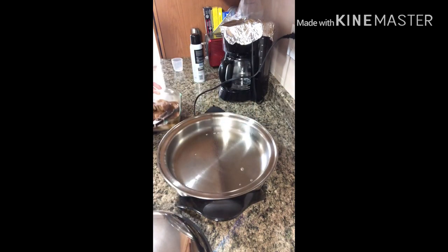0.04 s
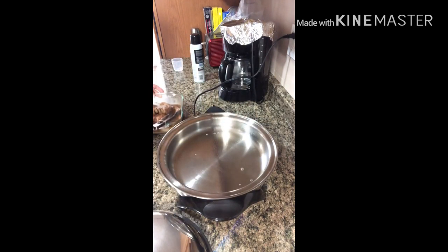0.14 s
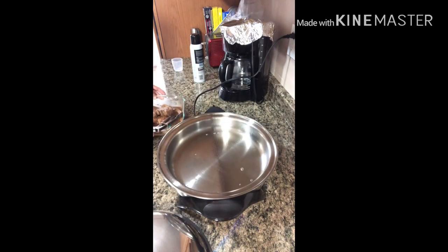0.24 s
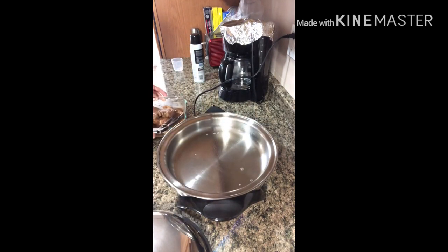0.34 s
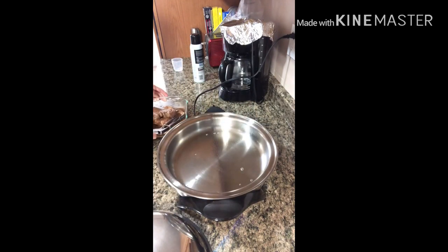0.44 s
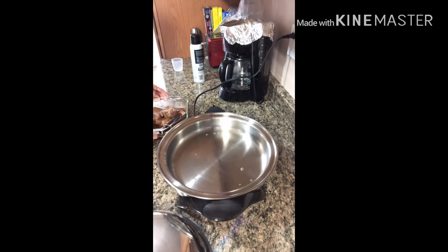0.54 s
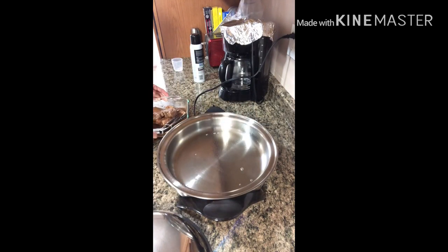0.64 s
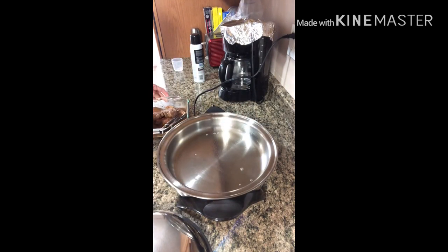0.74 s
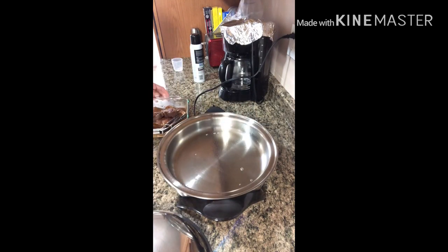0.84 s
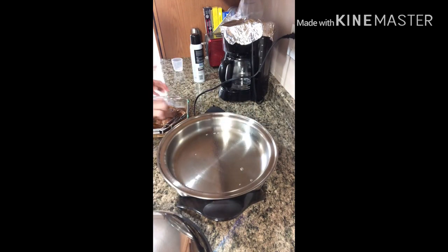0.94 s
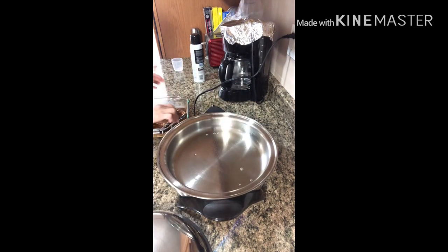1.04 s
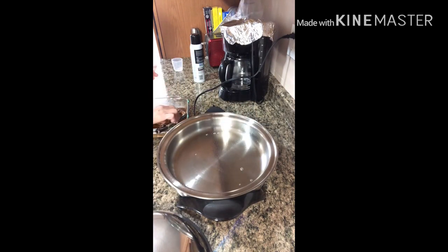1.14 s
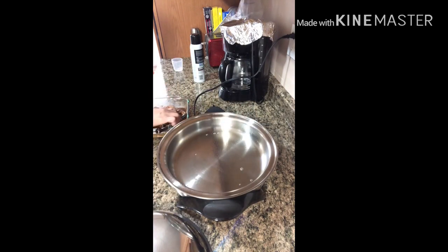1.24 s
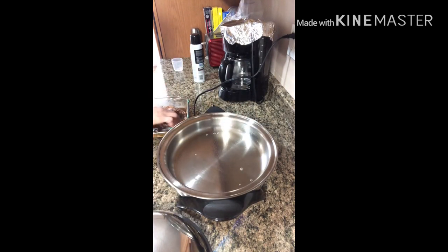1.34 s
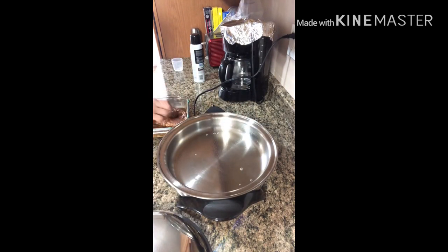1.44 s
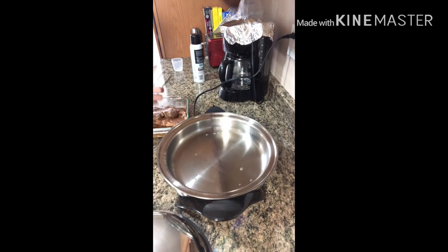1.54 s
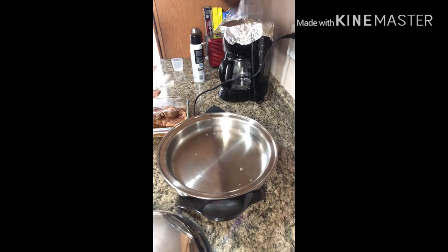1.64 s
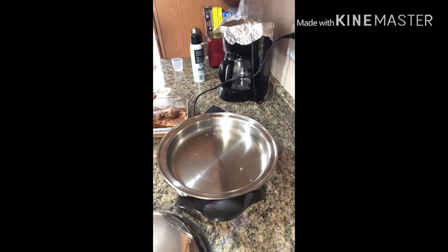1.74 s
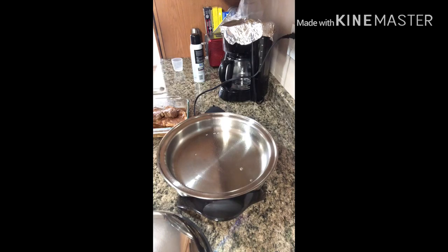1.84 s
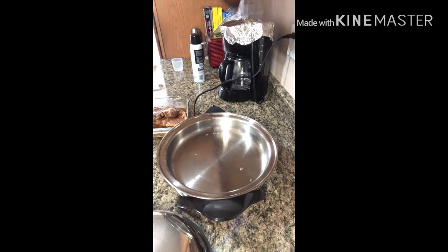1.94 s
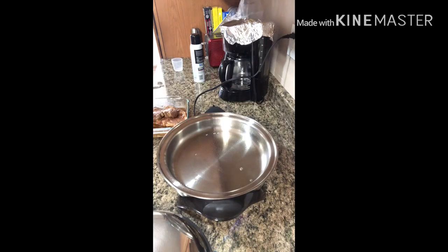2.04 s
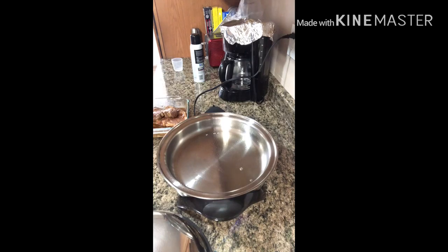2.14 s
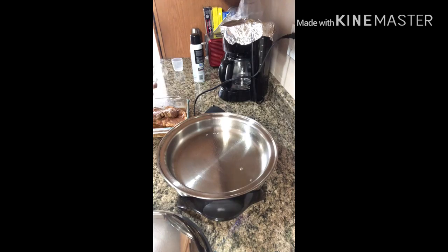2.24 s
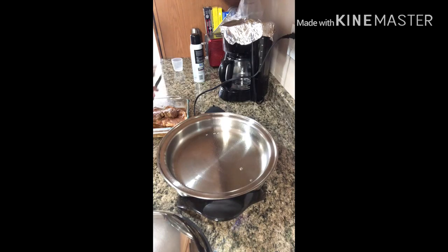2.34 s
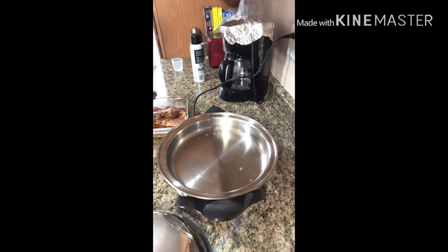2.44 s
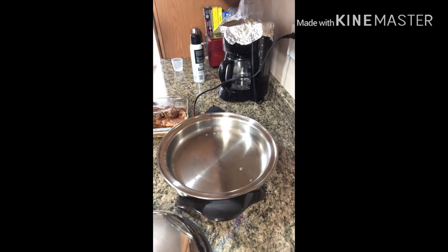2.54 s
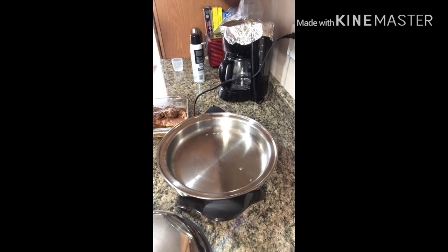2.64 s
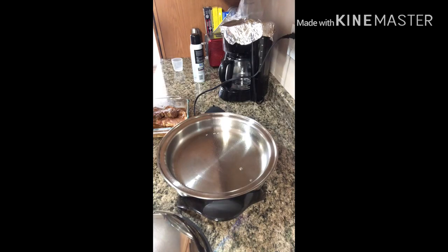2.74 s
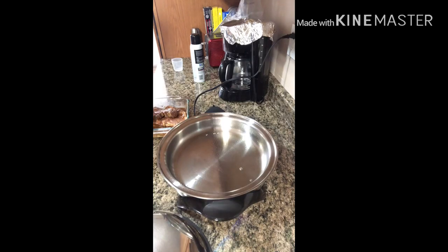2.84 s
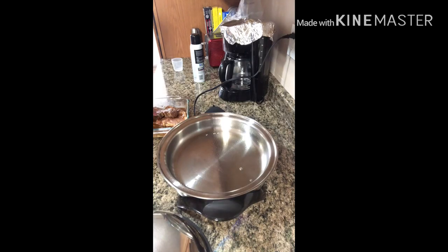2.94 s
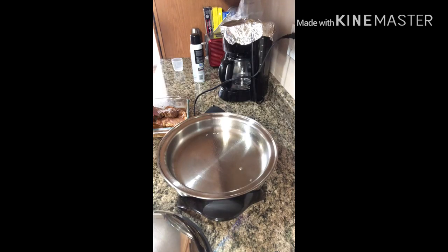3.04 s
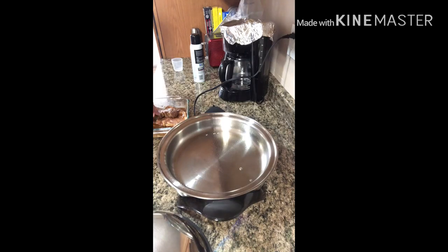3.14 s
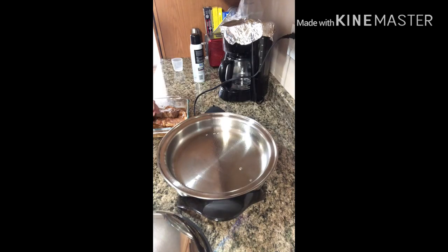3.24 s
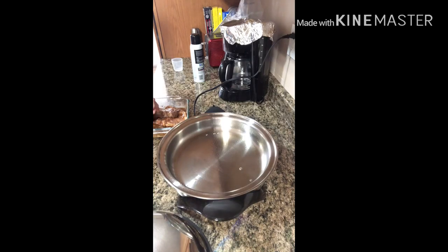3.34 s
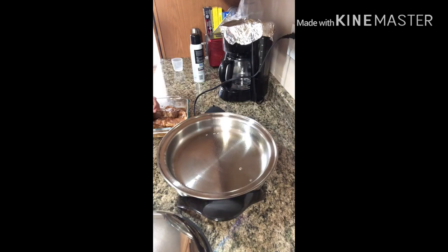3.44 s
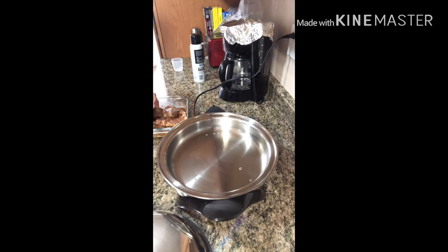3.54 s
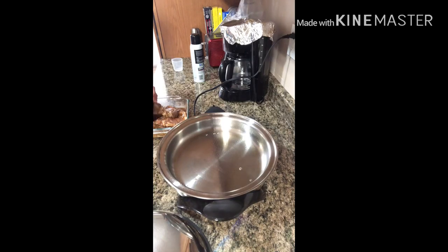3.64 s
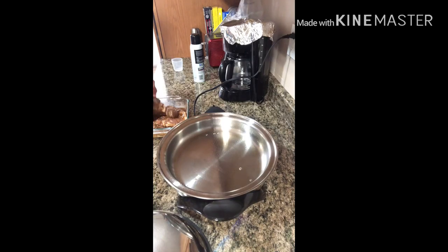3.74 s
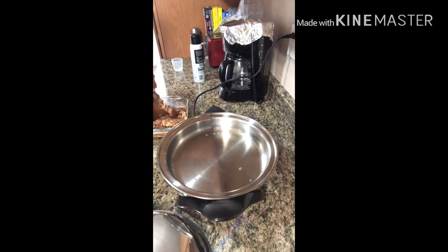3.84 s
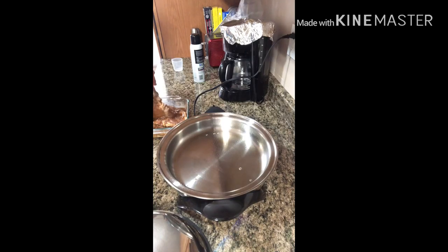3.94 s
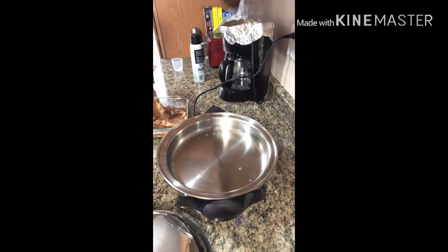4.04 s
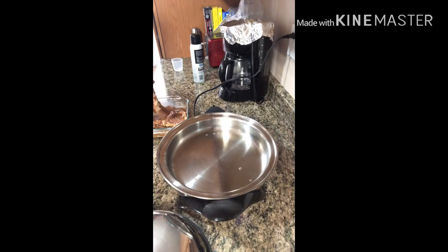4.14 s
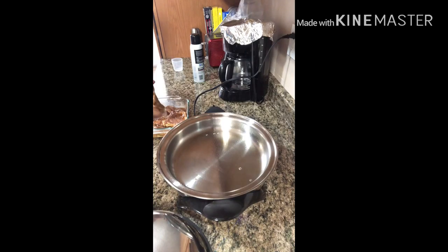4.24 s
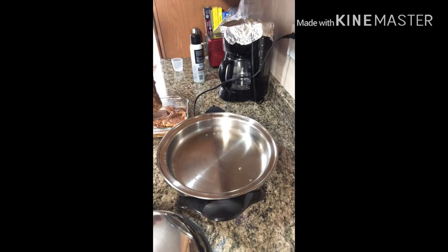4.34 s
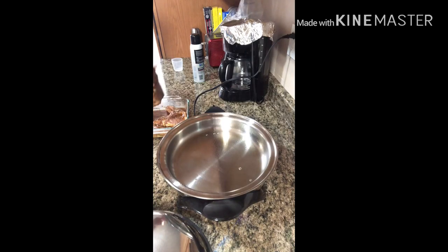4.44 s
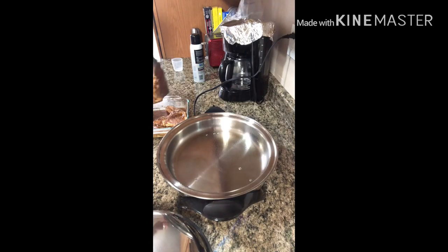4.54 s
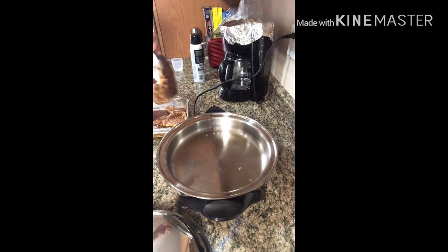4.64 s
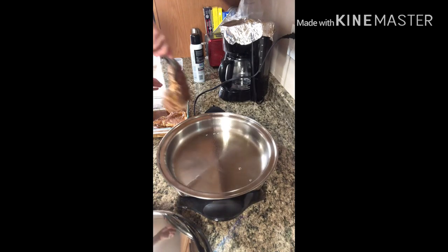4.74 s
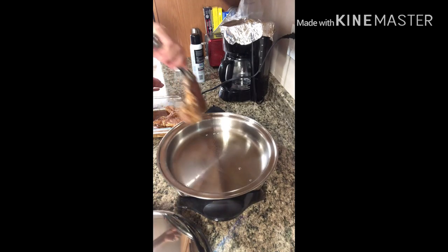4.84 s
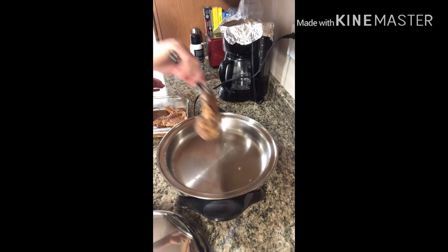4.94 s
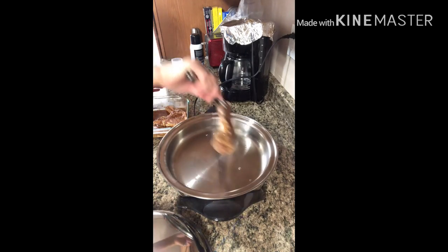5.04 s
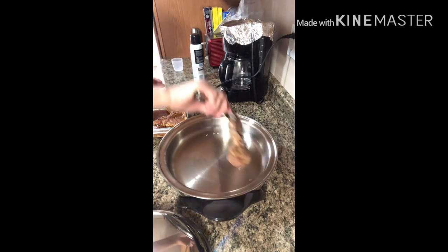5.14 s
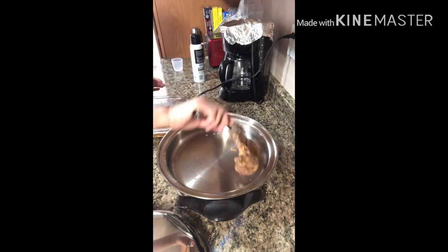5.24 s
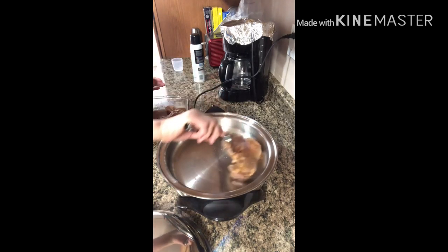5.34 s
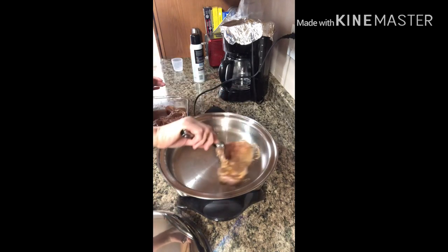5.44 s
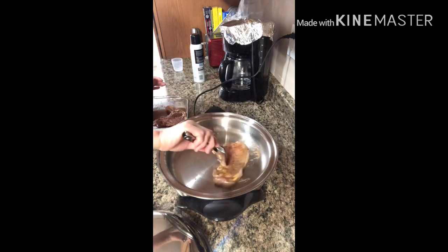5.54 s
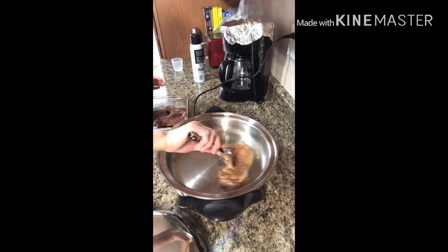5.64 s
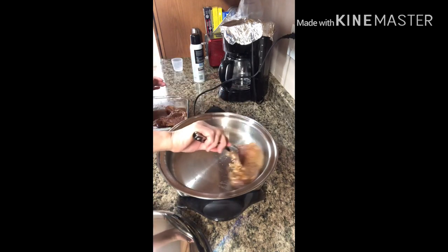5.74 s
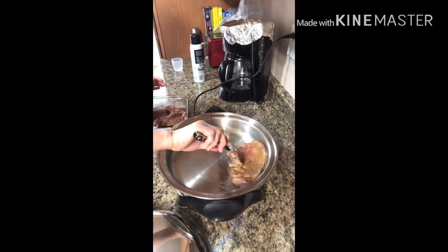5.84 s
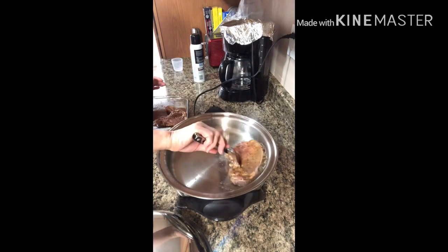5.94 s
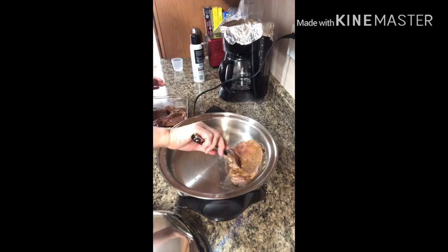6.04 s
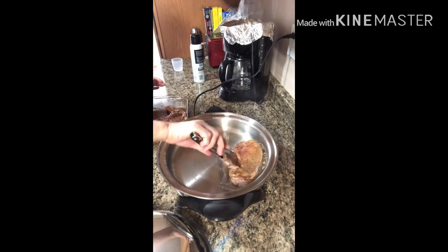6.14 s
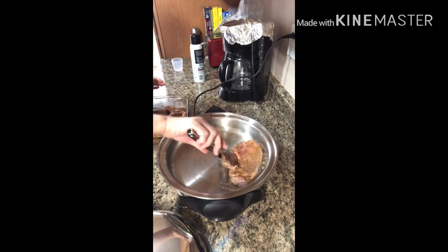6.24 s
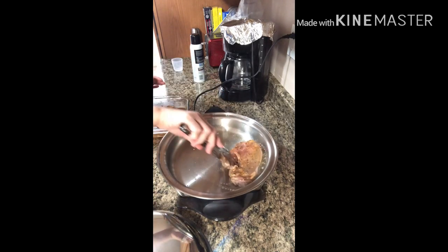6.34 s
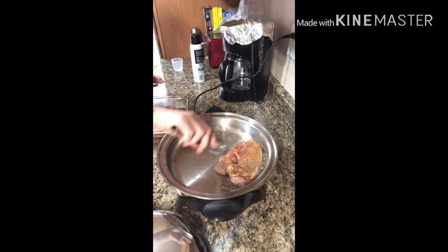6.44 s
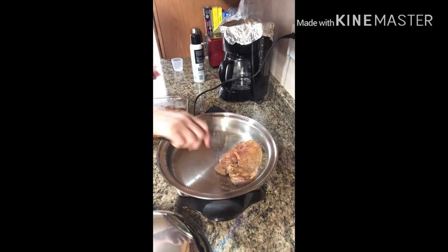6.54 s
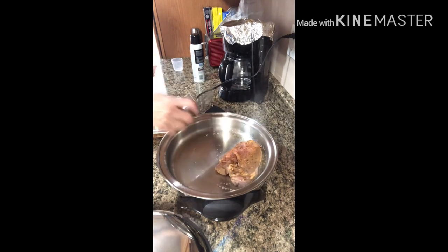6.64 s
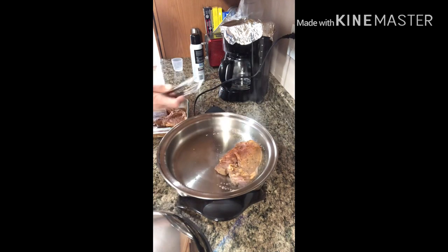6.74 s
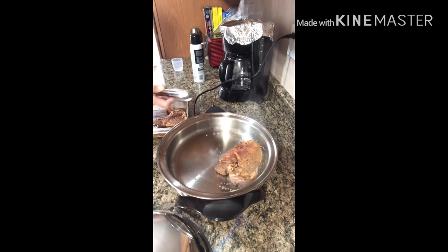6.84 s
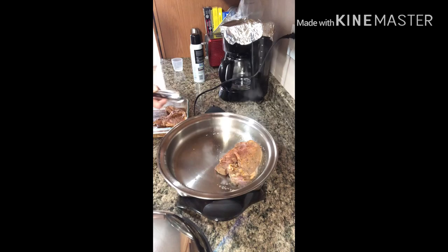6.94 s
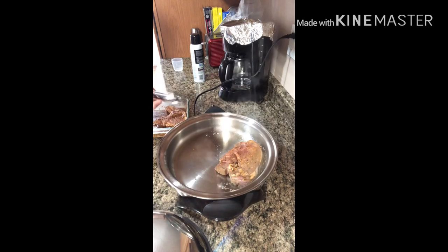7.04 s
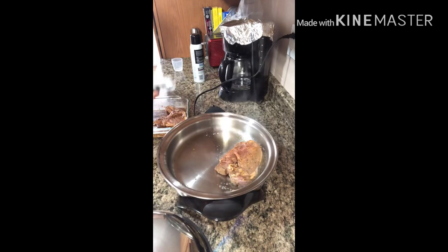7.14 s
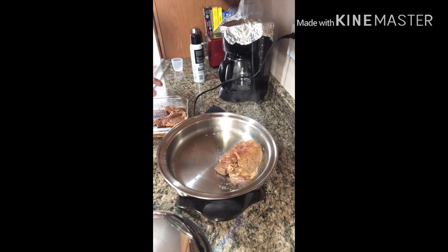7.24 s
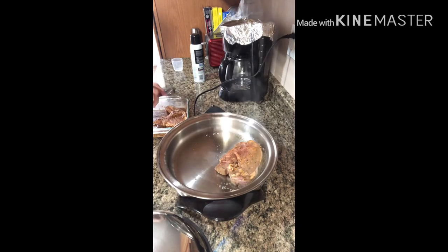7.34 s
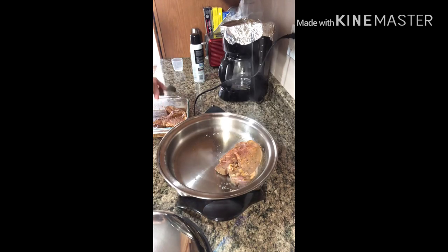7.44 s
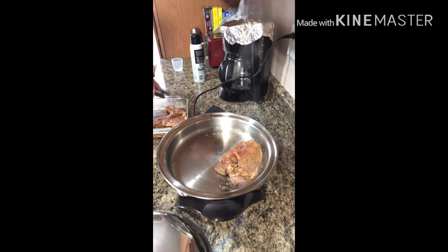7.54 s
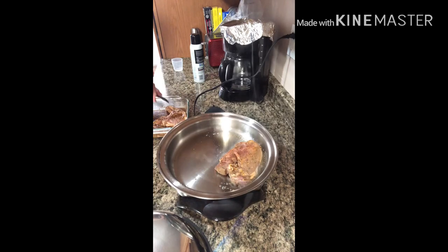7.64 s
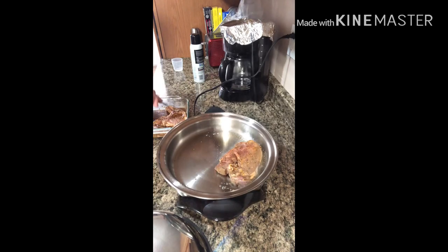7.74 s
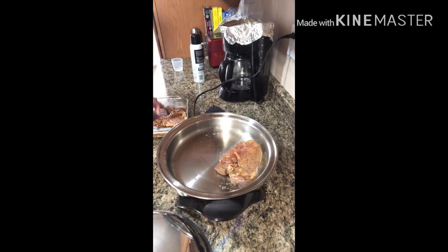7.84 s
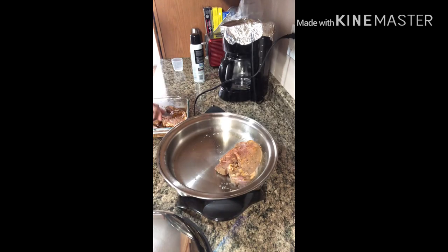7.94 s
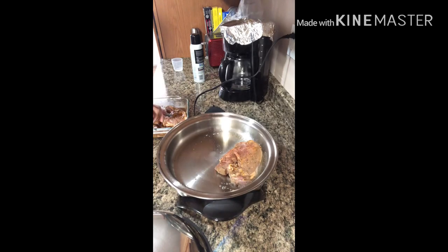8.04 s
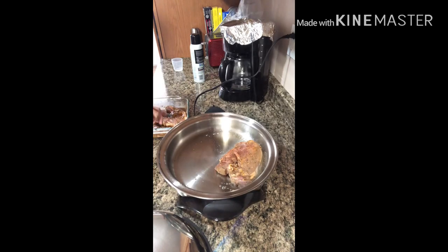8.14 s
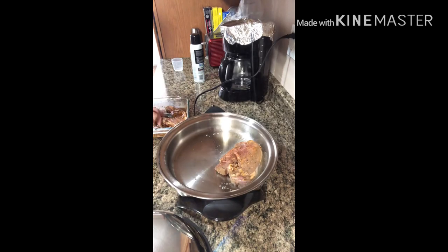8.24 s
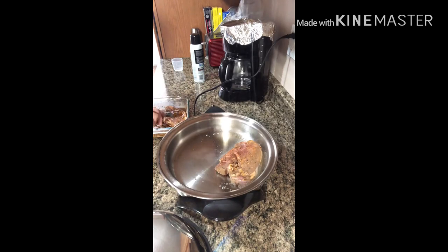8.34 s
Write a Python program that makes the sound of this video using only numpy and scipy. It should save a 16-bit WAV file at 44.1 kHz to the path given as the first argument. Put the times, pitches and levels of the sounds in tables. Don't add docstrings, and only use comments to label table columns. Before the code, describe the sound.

A small hard kitchen with a low fridge hum, heard by a phone on the counter side. Dull knocks on the worktop, a soft glass-dish clink, then steel tongs ticking and clacking. Tiny wet peeling smacks follow. At about five seconds meat touches hot oil, flashing into a bright, loud sizzle with sharp fat spits that continues to the end.

```python
import sys
import numpy as np
from scipy import signal
from scipy.fft import rfft, irfft, next_fast_len
from scipy.io import wavfile
from scipy.ndimage import uniform_filter1d

SR = 44100
rng = np.random.default_rng(int(sys.argv[2]) if len(sys.argv) > 2 else 0)


def voltage_ratio(level):
    return 10 ** (np.asarray(level, float) / 20)


def generate_wav(signal):
    frames = np.transpose(np.atleast_2d(signal))
    scaled = np.clip(frames, -1, 1) * 32767
    pcm = np.round(scaled).astype(np.int16)
    wavfile.write(sys.argv[1], SR, pcm)


N = 369558

# frequency in Hz, time to fade by 60 dB in seconds.
ROOM_FADE = [(100, 0.28), (1000, 0.45), (4000, 0.34), (15000, 0.13)]


def band(x, lo_hz, hi_hz, order=2):
    return signal.sosfilt(signal.butter(order, [lo_hz, min(hi_hz, .45 * SR)], "band", fs=SR, output="sos"), x)


def level(x, db):
    return x * voltage_ratio(db) / np.sqrt(np.mean(x ** 2))


def peak(x, db):
    return x * voltage_ratio(db) / np.max(np.abs(x))


def add(out, s, peak_db, x):
    i = int(s * SR)
    out[i:i + len(x)] += peak(x, peak_db)[:N - i]


def at_hz(table, hz):
    points = np.array(table)
    return np.interp(np.log(hz), np.log(points[:, 0]), points[:, 1])


def colour(x, table):
    size = next_fast_len(len(x))
    hz = 1 + np.arange(size // 2 + 1) * SR / size
    return irfft(rfft(x, size) * voltage_ratio(at_hz(table, hz)), size)[:len(x)]


def walk(rate):
    k = int(SR / rate)
    steps = np.repeat(rng.standard_normal(N // k + 1), k)
    return 0.99 * uniform_filter1d(uniform_filter1d(steps, k), k)[:N]


def thirds(first):
    return [(hz, hz * 2 ** (-1 / 6), hz * 2 ** (1 / 6)) for hz in 1000 * 2 ** (np.arange(first, 13) / 3)]


def ring(modes, shorter, lift_db=0., split=0.036):
    t = np.arange(SR // 2) / SR
    hz, db, t60 = np.repeat(np.transpose(modes)[:, :, None], 3, axis=1)
    db = db + np.repeat(np.zeros(len(modes)) + lift_db, 3)[:, None] + 2.2 * rng.standard_normal(hz.shape)
    turn = 2 * np.pi * hz * (1 + split * rng.standard_normal(hz.shape)) * t
    fade_db = -60 * t / (shorter * np.minimum(t60, .3))
    return np.sum(voltage_ratio(db + fade_db) * np.sin(turn), 0)


def burst(ms):
    t = np.arange(SR // 2) / (SR * max(ms, .3) / 1000)
    return rng.standard_normal(len(t)) * voltage_ratio(-20 * t) * np.minimum(t / 0.071, 1)


def frying():
    # time in seconds, level in dB, bubble size (-1 fine to 1 coarse).
    contact = [(5.08, -52.5, -0.067), (5.119, -39, 0), (5.22, -34.5, 0.059), (5.28, -29.5, 0.06),
               (5.39, -28, 0.68), (5.42, -28, -0.41), (5.53, -23.5, -0.2), (5.68, -24, -0.052),
               (5.76, -23.5, 0.26), (5.87, -24, 0.32), (5.94, -24, -0.0069), (6.8, -26, -0.1),
               (8.3, -32, 0.025), (8.38, -32, 0.098)]
    # frequency in Hz, level in dB per Hz.
    fizz_colour = [(150, -16), (250, -17), (282, -20.5), (372, -11), (516, -21.5), (593, -14.5),
                   (781, -11.5), (1100, -8), (1360, -7.5), (1890, -2.5), (2800, -4), (4030, -1),
                   (7510, -4.5), (8620, -8.5), (15500, -8.5)]
    # frequency in Hz, width in Hz, level against the fizz in dB.
    pan_tones = [(595.6, 10, -29.5), (1040, 36, -28), (1280, 49, -32), (1928, 14, -18), (1910, 110, -26.5),
                 (2260, 18, -17.5), (2746, 40, -16), (3980, 220, -19), (4840, 47, -23), (5360, 27, -15),
                 (6020, 36, -20), (7320, 42, -13)]
    jet_db, spray_db = -8, -6
    touch_s, flash_s, flash_db = 5.073, 0.036, 22
    flash_from_hz, flash_octaves = 2200, 1.8
    glug_s, glug_length_s, glug_hz, glug_db = 5.87, 0.049, 1060, -5

    start = 5 * SR
    t = np.arange(start, N) / SR
    times, contact_db, sizes = np.transpose(contact)
    db, size = np.interp(t, times, contact_db), np.interp(t, times, sizes)
    flash = np.exp(-np.maximum(t - touch_s, 0) / flash_s)

    def pops(rate, spread_db):
        clicks = rng.random(len(t)) < rate / SR
        strength = voltage_ratio(spread_db * rng.exponential(size=len(t))) * rng.standard_normal(len(t))
        return level(clicks * strength, 0)

    splash, out, seethe = pops(900, 1.3), 0, walk(14)
    for hz, lo, hi in thirds(first=-8):
        fizz = band(pops(1.5 * hz, 1.1) + voltage_ratio(-8) * splash, lo, hi)
        spray = float(hz > 8200)
        jet = np.exp(-(np.log2(hz / 5100) / 0.57) ** 2)
        size_db = (jet * jet_db + spray * spray_db) * size
        wander_db = (.5 * seethe + .5 * walk(3) + .8 * walk(25))[start:]
        early_db = flash_db * flash * np.clip(np.log2(hz / flash_from_hz) / flash_octaves, 0, 1)
        out = out + fizz * voltage_ratio(size_db + wander_db + early_db)
    out = colour(out, fizz_colour)
    out = out / np.sqrt(np.mean(band(out, 1320, 4130)[SR:] ** 2))

    pan = sum(level(band(pops(120, 2.2), hz - w / 2, hz + w / 2, order=1), pan_db) for hz, w, pan_db in pan_tones)
    pressed = np.clip(1 - abs(t - 5.58) / 0.13, 0, 1) ** .5
    squeak = level(band(pops(460, 2.6), 5000, 5100), -6.0) * voltage_ratio(2.7 * jet_db * size) * pressed
    glug = level(band(pops(330, 1.7), glug_hz * 0.83, glug_hz * 1.27), glug_db)
    glug = glug * np.exp(-((t - glug_s) / glug_length_s) ** 2)
    out = (out + pan + squeak + glug) * voltage_ratio(db)
    return np.r_[np.zeros(start), out * np.clip((t - touch_s) / .008, 0, 1) ** 2]


def spits():
    # start in seconds, peak in dB, bubble ring against the crack in dB, splatter in ms.
    drops = [(5.254, -14, -3, .9), (5.3977, -11, -11, 0.78), (5.4116, -5.5, -8, .6), (5.428, -7, -8, 1.1),
             (5.456, -9, -8, 1.3), (5.509, -4, -7, 0.83), (5.6054, -1, -2, 1.6), (5.6377, 3, -0.5, 1.5),
             (6.725, 0, -10, 1.3), (7.346, -7, -10, .8), (7.433, -19, -16, 1.3), (8.0735, -2.8, -5, 3.5),
             (8.296, -23, -12, 1.1), (8.31, -1.5, -17.5, 1.1)]
    out, t = np.zeros(N), np.arange(SR // 2) / SR
    for s, db, ring_db, ms in drops:
        hz = 4950 * (1 + 0.061 * rng.standard_normal())
        spray_db = min(-22 - 1.5 * ring_db, 8)
        crack = (t == 0) + .5 * burst(ms) ** 3
        bubble = np.sin(2 * np.pi * hz * t) * voltage_ratio(-60 * t / 0.0049)
        spray = peak(band(crack, 8500, 15200), spray_db)
        add(out, s, db, peak(band(crack, 1600, 12600), -0.89) + peak(bubble, ring_db) + spray)
    return out


def knocks():
    # start in seconds, peak in dB, contact time in ms.
    hits = [
        (0.3865, -22.5, 14),
        (0.546, -11, 6.4),
        (0.555, -13.5, 9.5),
        (3.396, -26.5, 18),
        (6.483, -32, 13),
    ]
    # frequency in Hz, level in dB per Hz.
    soft_spot = [(35, -29), (60, 0.5), (389, -4), (481, -7), (594, -3), (735, -26), (857, -28), (1140, -29),
                 (1850, -26), (2780, -52), (6000, -53), (7800, -82), (13200, -120)]
    hard_spot = [(35, -38), (60, -10.5), (136, 1), (283, -14), (408, -3), (689, -9), (827, -8), (927, -5),
                 (1760, -19.5), (2260, -24.5), (14000, -61)]
    far_spot = [(47, -34), (80, -7.5), (398, -3.5), (570, -7.5), (706, -6), (1340, -29), (1570, -20),
                (1880, -38), (2040, -40), (4000, -57), (5200, -82), (8800, -120)]
    pan_thump = [(60, -10), (120, 5), (220, 1), (400, -29), (1000, -50)]
    out, t = np.zeros(N), np.arange(SR // 2) / SR
    for (s, db, ms), spot in zip(hits, (soft_spot, hard_spot, far_spot, far_spot, pan_thump)):
        blow = 0
        for hz, lo, hi in thirds(first=-11.5):
            wide = 1 + .35 * np.clip((400 - hz) / 250, 0, 1)
            slab = band(burst(ms * (1000 / hz) ** 0.42), lo / wide, hi * wide, order=3)
            tail = rng.standard_normal(len(t)) * voltage_ratio(-70 * t / at_hz(ROOM_FADE, hz)) * np.minimum(t / 0.0072, 1)
            part = level(slab, 0) + level(band(tail, lo, hi, order=3), -6.5)
            blow = blow + part * voltage_ratio(at_hz(spot, hz) + 10 * np.log10(hz))
        add(out, s, db, blow)
    return out


def dish():
    # start in seconds, peak in dB, 2-3 kHz tones in dB, tones above 3 kHz in dB, rise in ms.
    clinks = [
        (1.097, -26, -1.5, -3.5, 2.8),
        (1.308, -31.5, -4.5, -37, 3.8),
    ]
    # frequency in Hz, level in dB, time to fade by 60 dB in seconds.
    glass_tones = [(488, -16, 0.13), (953, 0.5, 0.12), (1304, -4, 0.077), (1393, -6.5, .14),
                   (2057, -2, 0.044), (2280, 0, 0.061), (2750, -4, 0.079), (3320, -13, .05),
                   (3760, -4, 0.063), (4680, -4, 0.044), (5000, -14, .05), (5390, -6, 0.11),
                   (5950, 1, 0.045), (7060, -3, 0.054), (7600, -12, .04)]
    out = np.zeros(N)
    hz = np.array(glass_tones)[:, 0]
    t_ms = np.arange(SR // 2) * 1000 / SR
    for s, db, middle_db, upper_db, rise_ms in clinks:
        lift_db = np.where(hz < 1800, 0, np.where(hz < 3000, middle_db, upper_db))
        crack = peak(band(burst(9.6), 1870, 4050), middle_db - 7.5)
        crack = crack + peak(band(burst(12), 2600, 8000), upper_db - 3.0)
        glass = peak(ring(glass_tones, 0.87, lift_db, split=0.0099), 0)
        shimmer = peak(band(burst(45), 1200, 6100), (middle_db + upper_db) / 2 - 15)
        thud = peak(band(burst(24), 116, 620), -13.5)
        add(out, s, db + 1.5, (glass + shimmer + crack + thud) * np.minimum(t_ms / rise_ms, 1))
    return out


def scrape(out, s, db, hz, body_db, edge_db, ms):
    # frequency in Hz, level in dB, time to fade by 60 dB in seconds.
    steel_tones = [(2756, 6, 1.4), (2939, -37, 5.0), (3576, 9.5, 0.57), (4247, -18, 5.0), (5200, -14, 0.14),
                   (5440, -13, 0.16), (6660, 0, 0.4), (7630, 6, 0.19), (8037, -15, 0.79), (9350, -24, 0.17),
                   (11700, -18, 0.53), (13070, -6, 0.15), (13710, -20, 0.25), (14300, -11.5, 0.26)]
    rub = burst(ms)
    tick = peak(band(rub, 2700, 6700, order=3), body_db) + peak(band(rub, 8500, 15700, order=3), edge_db)
    steel = peak(band(ring(steel_tones, 0.3, split=0.056), 3200, 16000), -1.5)
    rattle = peak(band(burst(41), 2350, 15600, order=3), 0) + peak(band(burst(102), 2440, 7000, order=3), -11)
    steel_db = max(body_db, edge_db) - 6.5 + .5 * min(db + 32, 0)
    one_ring = peak(band(rub, hz * 0.94, hz * 1.145), -6.5)
    add(out, s, db, tick + one_ring + peak(steel + rattle, steel_db))


def tongs():
    # start in seconds, peak in dB, ring in Hz, edge against body in dB.
    clacks = [(1.8911, -49, 4450, -9), (1.9113, -47.5, 2750, -7), (2.1468, -41, 4240, 4),
              (2.1563, -27.5, 13100, 11), (2.1852, -34, 2900, -7), (2.3344, -54, 2870, -14),
              (2.3684, -49, 2800, -25), (2.4002, -30, 2850, 21), (2.417, -43, 3760, 9),
              (2.4377, -34.5, 5350, 9), (2.4843, -38, 4040, 9), (2.4973, -38, 3560, 2.5),
              (2.5506, -50, 3600, .2), (2.563, -14.5, 12300, 8), (2.57, -19.5, 3730, .3),
              (3.1897, -38.5, 3760, -29), (3.2264, -54, 3910, 15), (3.4381, -34.5, 11900, -4)]
    out = np.zeros(N)
    for s, db, hz, edge in clacks:
        scrape(out, s, db, hz, -4 - max(edge, 0), -4 + min(edge, 0), ms=12.7 - 0.1 * (db + 42))
    return out


def smacks():
    # start in seconds, peak in dB, ring in Hz.
    peels = [(3.2385, -45, 13900), (3.2574, -48, 11800), (3.2755, -47, 9500), (3.3174, -58, 5590),
             (3.5972, -46.5, 9900), (3.6296, -48, 5800), (3.6544, -53, 6200), (3.6964, -57, 7440),
             (3.7643, -47, 7750), (3.8444, -55, 7120), (3.907, -47, 13200), (3.9539, -49, 3580),
             (4.1364, -53, 13500), (4.2667, -54, 13600)]
    out = np.zeros(N)
    for s, db, hz in peels:
        scrape(out, s, db, hz, body_db=-16, edge_db=-5 + 6 * np.log2(hz / 11000), ms=7.1)
    return out


def rustle():
    # start in seconds, length in seconds, level in dB.
    moves = [
        (.9, .1, -74),
        (1.6, 0.055, -80),
        (1.786, 0.18, -75),
        (3.706, 0.23, -67),
        (4.02, .1, -78),
        (4.3, .17, -74),
    ]
    rise_db_s, fall_db_s = 150, 200
    t, out = np.arange(N) / SR, 0
    flutter = voltage_ratio(1.5 * walk(60))
    low = band(rng.standard_normal(N) * flutter, 420, 1560)
    grains = level(low + 0.32 * band(rng.standard_normal(N), 2100, 6300), 0)
    for s, length, db in moves:
        before, after = np.maximum(s - t, 0), np.maximum(t - s - length, 0)
        out = out + voltage_ratio(db - rise_db_s * before - fall_db_s * after)
    return out * grains


def kitchen():
    # frequency in Hz, average level in dB.
    fridge_tones = [(80.7, -65.5), (118.4, -62.5), (156.1, -65), (242.2, -71.5), (360.7, -74), (425.3, -67),
                    (473.7, -73)]
    # frequency in Hz, level in dB per Hz.
    rumble_colour = [(25, -42), (39, -24), (52, 1.5), (63, 3.5), (80, -6), (120, -1.5), (165, -5),
                     (200, -6.5), (250, -9), (310, -13), (420, -15), (520, -17), (900, -24.5), (1200, -47)]
    hiss_colour = [(400, -35), (700, -12), (1000, -2.5), (2000, -9), (7800, -14.5), (8300, -18.5),
                   (15800, -19.5)]
    rumble, swell = 0, walk(1.57)
    for hz, lo, hi in thirds(first=-15)[:16]:
        swell_db = 2.0 * swell * min(1, 150 / hz) + 2.4 * walk(11)
        rumble = rumble + band(rng.standard_normal(N), lo, hi) * voltage_ratio(swell_db)
    hiss = colour(rng.standard_normal(N), hiss_colour) * voltage_ratio(.6 * walk(2.5))
    t = np.arange(N) / SR
    hum = 0
    for hz, db in fridge_tones:
        hum = hum + voltage_ratio(db + 4.5 + 0.59 * walk(4.6)) * np.sin(2 * np.pi * hz * t + 1.3 * walk(9.8))
    return level(colour(rumble, rumble_colour), -56.5) + level(hiss, -69) + hum


def echoes(x):
    t = np.arange(int(.6 * SR)) / SR
    onset = np.clip((t - .004) / 0.003, 0, 1)
    noise = rng.standard_normal(len(t)) * onset
    tail = sum(band(noise, lo, hi) * voltage_ratio(-60 * t / at_hz(ROOM_FADE, hz)) for hz, lo, hi in thirds(first=-13.5))
    modes = rfft(tail)
    fine, broad = (np.sqrt(uniform_filter1d(np.abs(modes) ** 2, size=k)) + 1e-9 for k in (15, 240))
    tail = irfft(modes * broad / fine, len(t)) * onset * np.clip(2 - t / .25, 0, 1)
    return signal.fftconvolve(x, tail * voltage_ratio(-5.5) / np.sqrt(np.sum(tail ** 2)))[:N]


def scene():
    fat, far, glass, steel = spits(), knocks(), dish(), tongs() + smacks()
    wet = echoes(far * voltage_ratio(-9) + glass * voltage_ratio(-3) + steel * voltage_ratio(-6) + fat * voltage_ratio(1))
    mono = far + glass + steel + fat + wet + frying() + rustle() + kitchen()
    return np.array([mono, mono])


def wide_patches(out):
    # start in seconds, centre in Hz.
    patches = [(5.27, 12100), (5.455, 6600), (5.525, 7600), (5.732, 5800), (6.455, 5700), (6.455, 8300),
               (6.478, 15000), (7.545, 6600), (7.545, 13100), (7.707, 9000), (8.124, 15000)]
    for s, hz in patches:
        lo, hi = hz - 1000, hz + 1000
        patch = slice(int(s * SR) - 1024, int(s * SR) + 1024)
        apart = band(rng.standard_normal(2048), lo, hi, order=6) * np.hanning(2048)
        apart = level(apart, -6.5) * np.std(band(out[0, patch], lo, hi, order=6))
        out = out + np.outer([1, -1], np.pad(apart, (patch.start, N - patch.stop)))
    return out


def low_pass(x):
    return signal.sosfilt(signal.butter(12, 16640, fs=SR, output="sos"), x)


def record(dry):
    heard = band(np.clip(dry, -.97, .97), 45.3, 18960)
    out = signal.sosfilt(signal.ellip(10, .2, 80, 15760, fs=SR, output="sos"), heard)
    out = wide_patches(out)
    return low_pass(out)


dry = scene()
out = record(dry)
generate_wav(out)
```